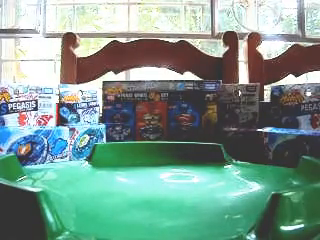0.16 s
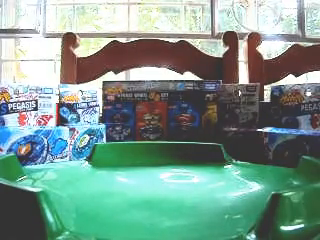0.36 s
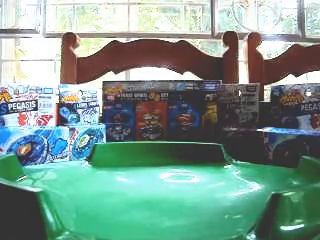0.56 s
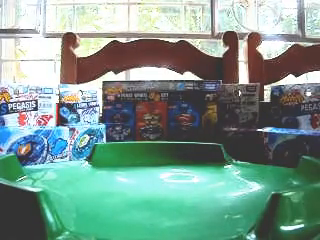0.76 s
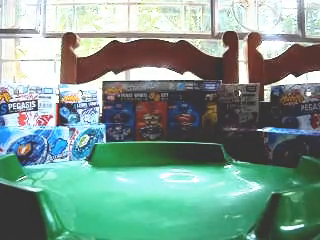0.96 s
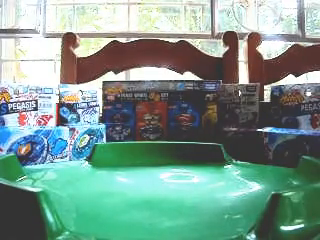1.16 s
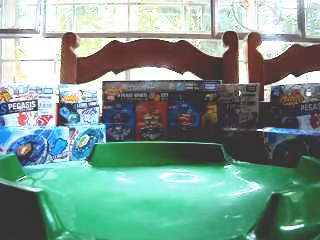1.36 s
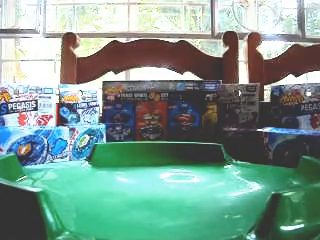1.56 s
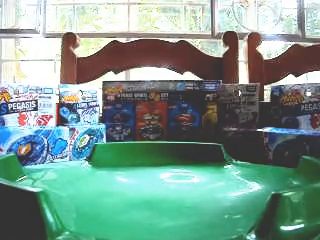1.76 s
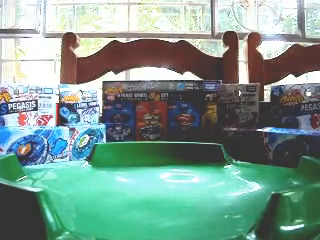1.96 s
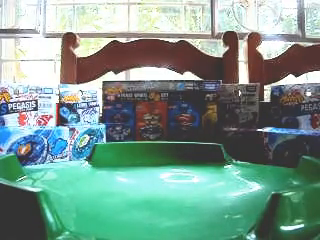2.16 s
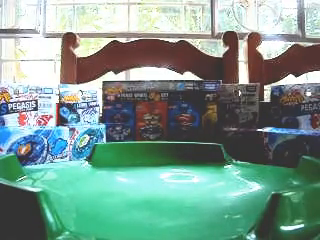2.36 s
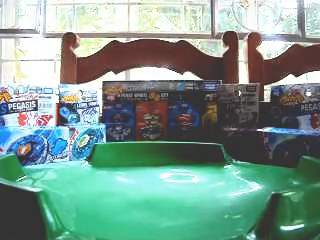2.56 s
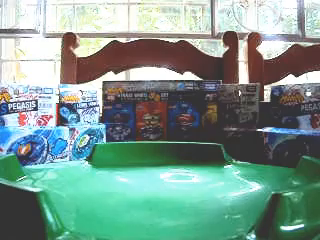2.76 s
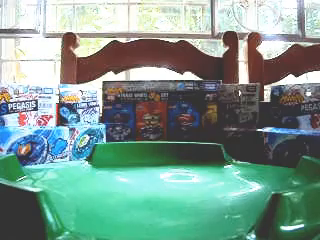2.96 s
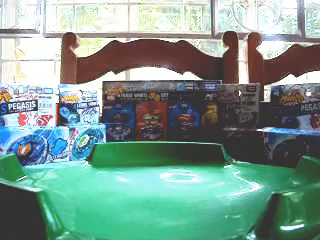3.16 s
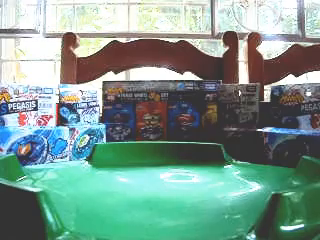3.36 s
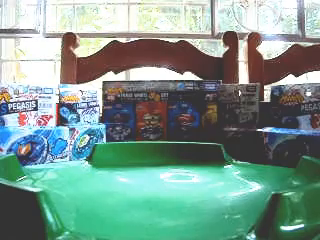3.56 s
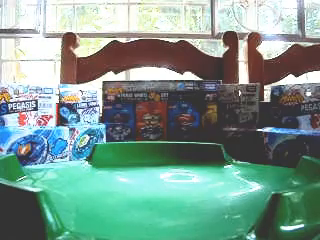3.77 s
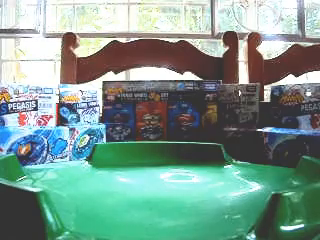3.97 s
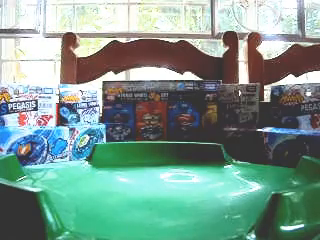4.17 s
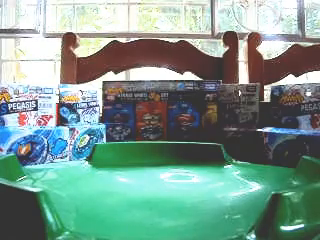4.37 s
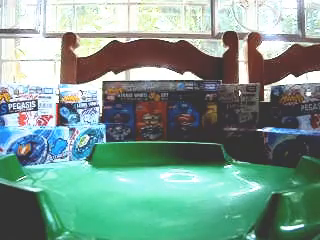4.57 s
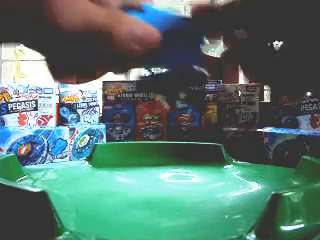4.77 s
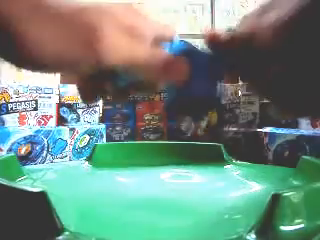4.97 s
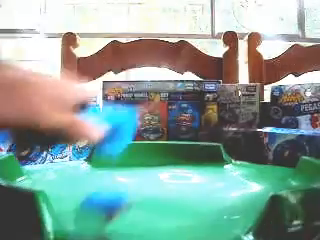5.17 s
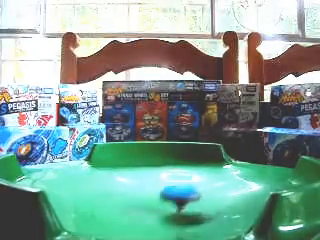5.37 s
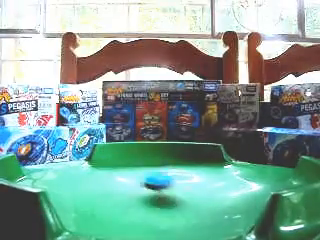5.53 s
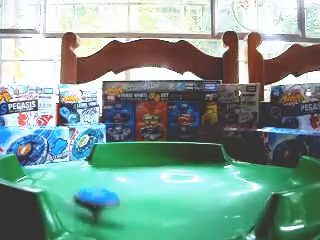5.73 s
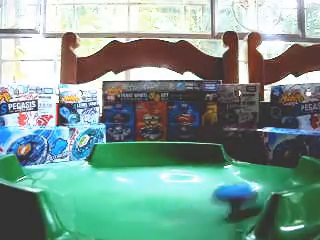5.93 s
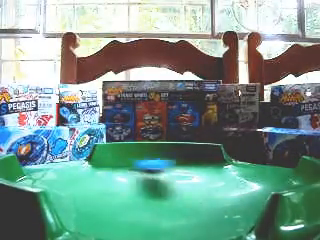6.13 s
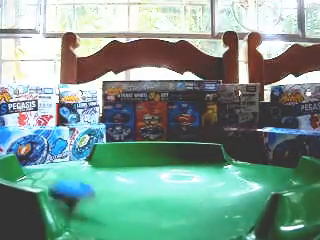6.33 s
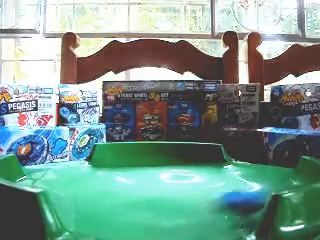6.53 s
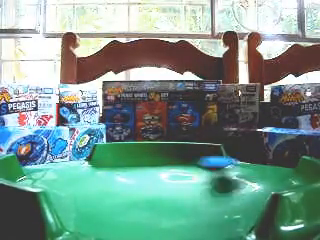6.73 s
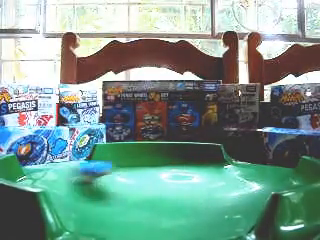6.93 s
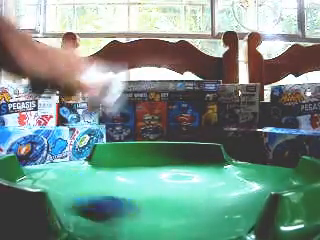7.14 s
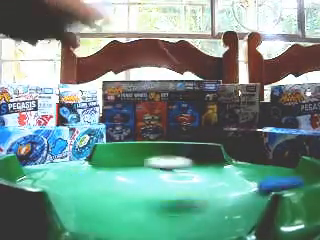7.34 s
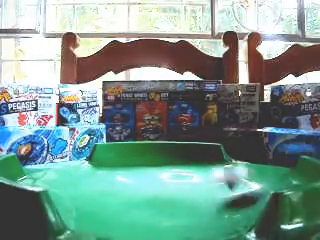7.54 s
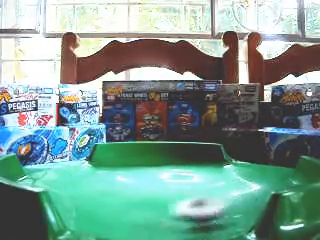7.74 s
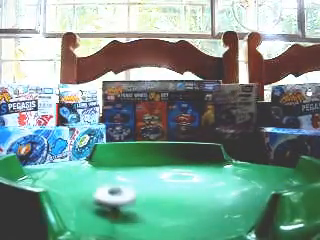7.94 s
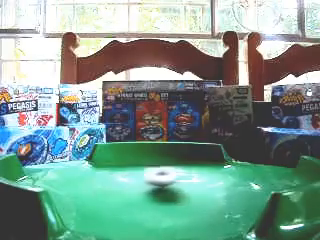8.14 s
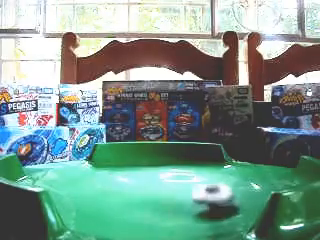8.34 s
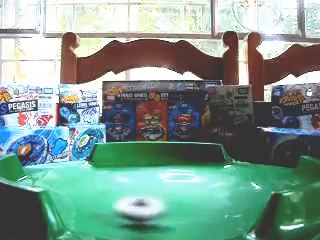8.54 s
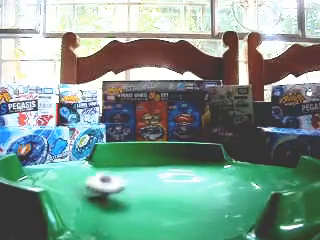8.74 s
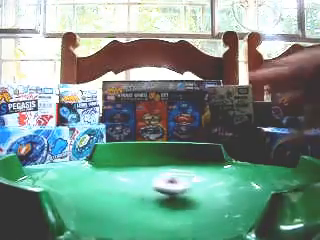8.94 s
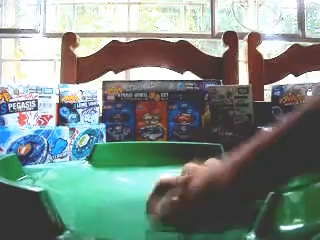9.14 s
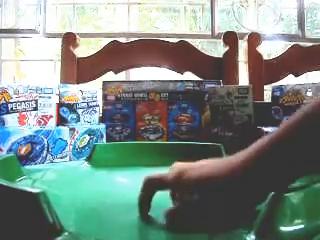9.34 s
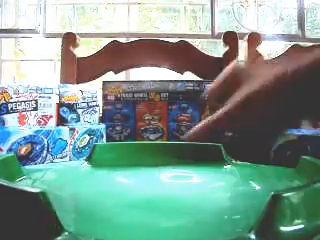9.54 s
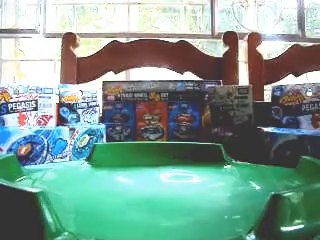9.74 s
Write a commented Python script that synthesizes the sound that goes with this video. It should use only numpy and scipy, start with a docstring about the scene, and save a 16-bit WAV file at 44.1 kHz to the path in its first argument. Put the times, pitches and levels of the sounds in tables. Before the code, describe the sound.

A small, dull microphone sits close to a plastic bowl on a table in a furnished room, with faint hiss and road rumble outside. At 0.2 s the bowl rattles strongly in quickening bounces; snaps and small clicks follow around 0.5 and 1.1-1.3, with light bumps at 1.7-2.0. A low hum comes and goes near 2.2. Soft knocks at 3.6-3.9 precede a vehicle's drone swelling to about 4.8, then fading. At 5.2 a toothed cord rips with a buzzing zip; a top lands in hard knocks at 5.35, with a bright metallic snap at 5.5 and bumps to 5.9. It circles with quiet rumble and whirr. A second rip at 7.25 leads to the loudest impacts at 7.45 and 7.77, tailing off by 8. A low wobbling hum peaks near 8.45, a launcher clunks down at 8.85, and slowing dull bumps at 9.3 stop the last top, leaving faint rumble.

```python
"""Close to a small microphone, launcher parts snap and clack (noise bursts) and a plastic bowl on a table is bumped
(noise bursts and ringing modes). A low hum comes and goes; an engine-like drone outside (sines) swells and fades
over road rumble (noise). Toothed cords (pulses and scrape) rip off two metal tops, one after the other; they land,
circle and whirr (noise through the bowl's modes) and clash. The bowl hums with a wobbling top (a sine), a launcher
clunks down on the table (modes and noise), and a hand brakes the last top in a few bumps."""
import sys
import numpy as np
from scipy import signal
from scipy.fft import rfft, irfft
from scipy.io import wavfile

SR = 44100
rng = np.random.default_rng(int(sys.argv[2]) if len(sys.argv) > 2 else 0)


def wrap_up_sound(samples):
    """Save the sound to the file named by the first command line argument, as 16-bit audio."""
    columns = np.atleast_2d(samples).T
    # keep every value between -1 and 1, then stretch to whole-number steps
    tamed = np.clip(columns, -1, 1)
    steps = np.round(tamed * 32767).astype(np.int16)
    wavfile.write(sys.argv[1], SR, steps)


N = 432180
TIME = np.arange(N) / SR  # seconds

# Modes of the plastic bowl. Each row: nominal frequency in Hz, relative level in dB, t60 in s.
BOWL = [(135.5, -3, 0.3), (193.8, -7.5, 0.19), (240, -11, 0.11), (285.6, -4.5, 0.12), (303.2, -5, 0.14),
        (437, -7.5, 0.16), (498.3, -5.5, 0.19), (553.2, -5, .15), (700, -4, 0.11), (741.2, -3, 0.13),
        (822, 0, 0.071), (902, 0, 0.1), (959.4, -0.5, .09), (1030, -3, 0.091), (1130, -4.5, 0.049),
        (1264, -1.5, 0.1), (1344, -8, 0.22), (1467, 7.5, 0.057), (1510, -11.5, .07), (1730, -17, 0.028)]


def amp(db):
    """Decibels to gain."""
    return 10 ** (np.asarray(db) / 20)


def unit(x, size=None):
    """Scales a sound so that its first samples, or all of it, have rms 1."""
    return x / np.sqrt(np.mean(x[:size] ** 2) + 1e-20)


def read(points, hz):
    """A table read on a log-frequency axis."""
    f, value = np.transpose(points)
    return np.interp(np.log(hz + 1), np.log(f + 1), value)


def curves(rows):
    """The columns of a table, after its column of times, at every sample."""
    s, *columns = np.transpose(rows)
    return [np.interp(TIME, s, column) for column in columns]


def add(mix, s, sound):
    """Mixes a sound in at a time in seconds."""
    part = mix[max(round(s * SR), 0):][:len(sound)]
    part += sound[:len(part)]


def gate(start, end, ramp):
    """1 between two times, with straight ramps inside both ends."""
    return np.clip(np.minimum(TIME - start, end - TIME) / ramp, 0, 1)


def band(x, lo_hz, hi_hz, order=3):
    """Causal band-pass."""
    return signal.sosfilt(signal.butter(order, [lo_hz, hi_hz], "band", fs=SR, output="sos"), x)


def colour(x, spectrum):
    """Filters a sound by a smooth curve of gain in dB over Hz."""
    return irfft(rfft(x) * amp(read(spectrum, np.fft.rfftfreq(N, 1 / SR))), N)


def drift(rate_hz):
    """Random wander of rms 1, mostly slower than a given rate."""
    keep = np.exp(-(np.fft.rfftfreq(N, 1 / SR) / rate_hz) ** 2)
    return unit(irfft(rfft(rng.standard_normal(N)) * keep, N))


def ringing(modes, t, detune=0):
    """One dying sine for each mode, with random phase and a slight chance shift of pitch."""
    hz, db, t60 = np.transpose(modes)[:, :, None]
    hz = hz * (1 + detune * rng.uniform(-1.1, 1, hz.shape))
    phase = rng.random(hz.shape)  # in turns
    return (amp(db - 60 * t / t60) * np.sin(2 * np.pi * (hz * t + phase))).sum(0)


def strike(t, t60, blow):
    """One hard contact followed by a dying scatter of noise."""
    return blow * (t == 0) + rng.standard_normal(len(t)) * amp(-60 * t / t60)


def bounces(start, length, gap):
    """Times and losses in dB of an object coming to rest: bounces ever sooner and weaker, the last die fastest."""
    ratio, loss_db, fall = .95, 1.17, 1.34
    k = np.arange(12)
    after = np.r_[0, np.cumsum(gap * ratio ** k[:-1])]
    return zip(start + after[after < length], loss_db * k ** fall)


def hit(level, spot_hz, weight, hardness, thump_hz, thump_width, flex_t60, crack_db, table_db,
        flex_db=17, blow=11, crack_t60=0.078, spot_db=7, spot_width=1.09, table_t60=0.25,
        crack_slope=0.75, crack_top_hz=4100):
    """A blow flexes the thin plastic in a quick dense burst, leaves its modes ringing and thuds into the table."""
    t = np.arange(SR // 4) / SR
    shell = ringing(BOWL, t, detune=.02) + amp(flex_db) * strike(t, flex_t60, blow)
    spot = amp(spot_db) * band(shell, spot_hz / spot_width, spot_hz * spot_width, order=1)
    table = band(strike(t, table_t60, blow), 45, 130, order=2)
    thump = band(shell, thump_hz / thump_width, thump_hz * thump_width, order=2)
    body = band(shell, 390, 1450, order=4) + spot
    edge = band(shell, 1342, 1870, order=2)
    crack = band(strike(t, crack_t60, blow), 1800, crack_top_hz, order=2)
    # weight feeds the table and the thump, hardness the edge and the crack
    parts = [(table, weight + table_db), (thump, weight), (body, 0), (edge, hardness),
             (crack, crack_db + crack_slope * hardness)]
    return sum(amp(level + db) * unit(part, size=1000) for part, db in parts)


def air(rumble_db=2, hiss_db=-56, tyre_db=-15, gust_db=1):
    """Two filtered noises: gusty road rumble from outside, and a smooth hiss that swells a little with it."""
    # Road level before the trims above. Each row: time in s, level in dB.
    road_level = [(0.1, -49.5), (3.2, -47), (4.0, -39), (5.05, -38), (6.1, -48), (7.1, -44.5), (9.1, -54),
                  (9.7, -55.5)]
    # Spectrum of the rumble. Each row: frequency in Hz, relative density in dB.
    rumble_spectrum = [(18, -38.5), (30, -15.5), (50, -3), (75, -7.5), (95, -13), (125, -5), (160, -5.5),
                       (210, -5.5), (300, -1), (420, -3), (550, -4.5), (800, -11.5), (1400, -16),
                       (2500, -28.5), (3500, -53.5)]
    # Spectrum of the hiss. Each row: frequency in Hz, relative density in dB.
    hiss_spectrum = [(500, -18), (1200, -0.5), (2200, -2), (4000, -2), (5000, -0.5), (6000, -4),
                     (7000, -25.5)]
    road, = curves(road_level)
    rumble = unit(colour(rng.standard_normal(N), rumble_spectrum))
    hiss = unit(colour(rng.standard_normal(N), hiss_spectrum))
    hiss_gain = np.hypot(amp(hiss_db), amp(road + tyre_db))
    return amp(road + rumble_db + gust_db * drift(6.7)) * rumble + hiss_gain * hiss


def engine(bass_db=(-41, -45), boom_db=(11, 5), middle_db=(-2, 0), upper_db=-10, fall_db=5.5,
           waver=0.00301, flutter_db=2):
    """Firing harmonics through the window: the lowest two swell in passing and boom under throttle, the rest flutter."""
    # Each row: time in s, firing rate in Hz before the waver, middle harmonics in dB before their offsets.
    firing = [(.7, 57.83, -58.5), (1.3, 66.73, -47), (2.0, 66.9, -50), (2.7, 65.76, -50.5),
              (3.2, 59.26, -50), (3.7, 59.7, -50.5), (4.25, 61.84, -39.5), (4.55, 64.7, -27.5),
              (4.8, 65.95, -36.5), (5.1, 66.97, -31), (6.1, 67.7, -59.5), (7.0, 65.33, -44),
              (8.0, 61.3, -52), (9.7, 56.65, -63)]
    pass_s, pass_width_s = 4.81, 0.5  # when nearest; time to travel its own distance from the house
    hz, level = curves(firing)
    throttle = gate(3.02, 4.63, ramp=0.3)  # the exhaust booms while the engine pulls
    near_db = -10 * np.log10(1 + ((TIME - pass_s) / pass_width_s) ** 2)
    turns = np.cumsum(hz * (1 + waver * drift(8.9))) / SR
    levels = [db + near_db + boom * throttle for db, boom in zip(bass_db, boom_db)]
    levels += [level + db for db in middle_db]
    levels += [levels[-1] + upper_db - fall_db * k for k in range(6)]
    out = np.zeros(N)
    for k, db in enumerate(levels, 1):
        flutter = flutter_db * min(k / 3, 1) * drift(6)
        out += amp(db + flutter) * np.sin(2 * np.pi * k * turns)
    return out


def low_hum(start=1.88, end=2.55, hz=114, level_db=-45, ramp=0.29):
    """A second low hum, one gently wavering sine, comes and goes."""
    return amp(level_db + drift(9)) * gate(start, end, ramp) * np.sin(2 * np.pi * hz * TIME)


def put_down(start=8.8453, length=.07, gap=.021, level_db=-24, rebound_db=-5, scatter_db=6, scatter_t60=0.041):
    """A launcher is dropped on the table: its modes and a noise burst make a pitched clunk with quick bounces."""
    # Modes of the plastic launcher. Each row: frequency in Hz, relative level in dB, t60 in s.
    launcher = [(280, -12, 0.23), (507, -15.5, .08), (766, -8, .12), (888, -1, 0.12), (1043, -10.5, .12),
                (1260, -9, 0.16), (1380, -13, 0.07), (1690, -21.5, .12), (2100, -20, .08)]
    out, t = np.zeros(N), np.arange(SR // 2) / SR
    for s, loss in bounces(start, length, gap):
        clunk = ringing(launcher, t) + amp(scatter_db) * band(strike(t, scatter_t60, 10), 220, 1500)
        gain = amp(level_db - loss + rebound_db * (s > start))
        add(out, s, gain * unit(band(clunk, 120, 2600), size=1000))
    return out


def winding(start=1.21, length=.09, snap_db=-46, clack_db=5, count=4):
    """Small pawl clicks, uneven in time and level, as a top is twisted onto its launcher."""
    chance = rng.random((count, 2))
    return [(start + length * (k + late) / count, snap_db - 3 * weak, clack_db)
            for k, (late, weak) in enumerate(chance)]


def clicks(snap_db=1, snap_hz=3560, blow=6, clack_t60=0.024, snap_t60=0.017, spread=1.24, rim_db=-24, clack_db=-1):
    """Hard contacts: a very short snap, a duller clack of plastic and a faint ring of metal."""
    # Small contacts of launcher, pawl and metal rims, before the trims snap_db and clack_db.
    # Each row: time in s, snap in dB, plastic clack in dB above the snap.
    contacts = [(0.515, -38.5, 4), (0.748, -49, -2.5), (1.145, -34, -3.5), (1.164, -32.5, -5.5),
                (1.178, -43, 11), (1.2, -38.5, 1), (1.341, -41, -6.5), (2.517, -47.5, -6),
                (2.735, -55.5, 2.5), (2.856, -50, -5), (3.591, -44, -3), (5.282, -32.5, 9.5),
                (5.291, -31, 6.5), (5.305, -28, 7.5), (5.485, -25, -2), (5.491, -27.5, -4),
                (5.512, -16.5, -10.5), (5.52, -28, -6.5), (5.581, -32.5, -8), (5.858, -31, 9),
                (7.375, -31, 3.5), (7.628, -34.5, -2.5), (7.683, -29.5, -13.5), (7.862, -29.5, -12)]
    # Modes of a metal rim. Each row: frequency in Hz, relative level in dB, t60 in s.
    rim = [(2843, -4, .4), (3060, -4, .4), (3250, -4, .45), (3370, -1, .45), (3450, -1, .45), (3555, 0, .5),
           (3698, 0, .45), (3768, -3, .4)]
    out, t = np.zeros(N), np.arange(SR // 2) / SR
    for s, snap, clack in contacts + winding():
        plastic = unit(band(strike(t, clack_t60, blow), 1200, 1830, order=2), size=1000)
        metal = unit(band(strike(t, snap_t60, blow), snap_hz / spread, snap_hz * spread, order=2), size=1000)
        metal = metal + amp(rim_db) * ringing(rim, t)
        add(out, s, amp(snap + snap_db) * (metal + amp(clack + clack_db) * plastic))
    return out


def rattles(far_db=-10, earliest=.3, latest=.7):
    """The nudged bowl rocks on its stiff wall; after each bounce its far side touches the table more softly."""
    # Each row: start in s, length in s, first gap in s, level in dB, favoured frequency in Hz,
    # weight in dB, hardness in dB.
    nudges = [(0.162, .29, .046, -17.5, 588, -4, -11), (1.723, .022, 0.013, -27.5, 1003, -6, -4.5),
              (3.591, .06, .044, -29.5, 700, -3.5, -4)]
    out = np.zeros(N)
    for start, length, gap, level, *touch in nudges:
        for s, loss in bounces(start, length, gap):
            far_s = s + gap * (earliest + (latest - earliest) * rng.random())
            for at, db in (s, level - loss), (far_s, level - loss + far_db):
                add(out, at, hit(db, *touch, thump_hz=382, thump_width=1.33, flex_t60=0.073,
                                 crack_db=-18.5, table_db=-26.5, crack_top_hz=2900))
    return out


def grab(start=9.324, gap=.018, slowing=1.16, level_db=-39, loss_db=2.0, thump_db=-39, count=6):
    """Fingers brake the last top: it bumps the floor of the bowl ever more slowly and dully."""
    out, s = np.zeros(N), start
    for k in range(count):
        level = level_db - loss_db * k
        # the thump keeps its level while the rest weakens
        add(out, s, hit(level, 660, thump_db - level, -9.5, thump_hz=164, thump_width=1.5, flex_t60=0.095,
                        crack_db=-7, table_db=-17))
        s += gap * slowing ** k
    return out


def ripcords(jitter=0.018, roll_off=1.1, rasp_db=2, uneven_db=4.5, buzz_rise_db=55, rasp_rise_db=15,
             bite_s=0.019, slip_db=8, release_db_per_s=330):
    """The toothed cord races through the launcher: a rising buzz and a rasp in its plastic case."""
    # Each row: yank in s, lead-in in s, length in s, acceleration in teeth per s per s,
    # buzz in dB and rasp in dB, both before the trims and the colour of the case.
    pulls = [(5.225, .075, .075, 19000, -29, -33.5), (7.261, 0.041, 0.13, 18500, -30, -30.5)]
    # Colour of the case. Each row: frequency in Hz, gain in dB.
    case = [(300, -30.5), (900, -7.5), (1400, 7.5), (1900, -3.5), (2400, -6.5),
            (3000, -8.5), (3700, 0.5), (4500, -2), (6500, -14.5)]
    slack_rate, yank_rate, top_rate = 1250, 1400, 2050  # teeth per second before the jitter
    out = np.zeros(N)
    for yank, lead, length, acceleration, buzz, rasp in pulls:
        t = TIME - yank
        rate = np.clip(yank_rate + acceleration * t, slack_rate, top_rate)
        turns = np.cumsum(rate * (1 + jitter * drift(250))) / SR
        teeth = unit(sum(np.cos(2 * np.pi * k * turns) / k ** roll_off for k in range(1, 4)))
        scrape = unit(band(rng.standard_normal(N), 500, 7000))
        # the teeth bite as the slack is taken up, then slip lightly soon after the yank
        slack, slipping = np.clip(-t / lead, 0, 1), np.clip(t / bite_s - 1, 0, 1)
        pull = amp(buzz - buzz_rise_db * slack - slip_db * slipping) * teeth
        pull += amp(rasp + rasp_db - rasp_rise_db * slack) * scrape
        release = release_db_per_s * np.maximum(t - length, 0)
        out += pull * amp(uneven_db * drift(90) - release) * (t > -lead)
    return colour(out, case)


def rolling(rumble_db=-2, whirr_db=-1, hum_db=-1, grain_db=3):
    """Spinning tips shake the bowl as they run over its small bumps, and whirr in a narrow band."""
    # Tips running round the bowl. Each row: start in s, end in s, rumble in dB before trim, fade in dB per s.
    runs = [(5.62, 7.762, -46, -0.5), (7.783, 8.292, -25.5, 44.5), (8.262, 9.324, -50.5, 0.5)]
    # Tips scrubbing the slope. Each row: start in s, end in s, whirr in dB before trim, fade in dB per s.
    whirrs = [(5.63, 7.76, -64, 1), (6.696, 7.0, -56, 17), (7.777, 8.2, -37.5, 62)]
    # The bowl hums in tune with a wobbling top. Each row: time in s, pitch in Hz, level in dB before trim.
    wobble = [(8.15, 293.6, -69), (8.299, 285.3, -39.5), (8.44, 282, -31.5), (8.52, 271, -35),
              (8.58, 268, -57)]
    lap_s, nearest_s, swing_db = .6, 6.2, 1.5  # a lap of the bowl, one loudest moment, swing up and down
    bumps = rng.standard_normal(N) * amp(grain_db * drift(40))
    bowl = signal.oaconvolve(bumps, ringing(BOWL, np.arange(SR // 2) / SR))[:N]
    shake = amp(rumble_db) * unit(band(bowl, 96, 600, order=1))
    whirr = amp(whirr_db) * unit(band(bumps, 1445, 1540, order=2))
    lap_db = swing_db * np.cos(2 * np.pi * (TIME - nearest_s) / lap_s)
    out = np.zeros(N)
    for sound, stretches in (shake, runs), (whirr, whirrs):
        for start, end, db, fade in stretches:
            faded = fade * np.clip(TIME - start, 0, end - start)
            out += sound * amp(db + lap_db - faded) * gate(start, end, .02)
    hz, db = curves(wobble)
    hum = amp(db + hum_db + drift(20)) * np.sin(2 * np.pi * np.cumsum(hz) / SR)
    return out + hum * gate(wobble[0][0], wobble[-1][0], .01)


def knocks():
    """Tops land, bounce and throw each other against the wall; now and then a hand knocks the bowl."""
    # Single blows on the bowl. Each row: time in s, level in dB, frequency in Hz that the struck spot favours,
    # weight in dB, hardness in dB, thump in Hz.
    blows = [(0.04, -41, 840, -6, -18.5, 368), (1.71, -38.5, 1000, -26, -5, 260),
             (1.813, -37, 760, -7, -16, 280), (2.023, -43.5, 980, -7, -9, 235),
             (3.708, -30.5, 545, -22, -5, 322), (3.879, -34.5, 547, -17, -10.5, 250),
             (5.331, -13.5, 730, 2, -7.5, 235), (5.343, -13.5, 703, -18, -21, 245),
             (5.351, -12, 716, -21.5, -12.5, 240), (5.452, -20.5, 676, 0, -6, 190),
             (5.535, -26, 560, 0, -20.5, 208), (5.822, -26.5, 547, 0.5, -3, 310),
             (5.857, -19.5, 1030, -17, -9, 295.1), (6.144, -39.5, 1038, -11, -3.5, 170),
             (7.435, -8.5, 1033, -5, -4, 239), (7.447, -9.5, 956, -33.5, -17.5, 236.8),
             (7.577, -18.5, 857, -8, -6, 305), (7.635, -25, 970, -4.5, -18.5, 235),
             (7.756, -22.5, 740, -7, -6, 345), (7.767, -6.5, 720, -26, -20, 259),
             (7.772, -12.5, 1430, -12.5, -15, 269.5), (7.788, -21.5, 545, 5.5, -21, 263),
             (7.874, -17, 700, -9, -6.5, 230), (7.89, -23, 670, 0.5, -19, 275),
             (7.91, -34, 530, 12, -9, 280), (7.965, -41.5, 535, 19.5, -7, 280),
             (8.51, -50, 858, 21, -10, 217)]
    out = np.zeros(N)
    for s, *blow in blows:
        add(out, s, hit(*blow, thump_width=1.344, flex_t60=0.061, crack_db=-13.5, table_db=-20.5))
    return out


def room(x, build=0.0009, count=3):
    """A furnished room: dense reflections, each band dying at its own speed."""
    # Decay of the room. Each row: frequency in Hz, t60 in s.
    room_decay = [(120, 0.84), (300, 1), (800, 0.55), (2000, 0.73), (4000, 0.53), (7000, 0.84)]
    out = np.zeros(N)
    for k in range(count):
        taps = rng.standard_normal(SR) * (1 - np.exp(-(np.arange(SR) / SR / build) ** 2))
        hz, t, z = signal.stft(taps, SR, nperseg=256)
        decay = amp(-60 * t / read(room_decay, hz)[:, None])
        tail = signal.istft(z * decay, SR, nperseg=256)[1]
        # three random tails crossfade, so no chance colour stays; the summed power stays even
        share = np.sqrt(2 / count) * np.cos(np.pi * (7 * TIME + k / count))
        out += signal.fftconvolve(x * share, tail / np.linalg.norm(tail))[:N]
    return out


def scene(knock_room_db=-8, click_room_db=-6):
    """Bowl and launchers in the room, over the sounds from outside."""
    dull = knocks() + rattles() + put_down() + grab()
    hard = clicks() + ripcords()
    echo = room(amp(knock_room_db) * dull + amp(click_room_db) * hard)
    return (dull + hard + echo + rolling() + engine() + low_hum() + air())[None]


def record(dry):
    """A dull little microphone that rounds off the highest peaks; then a steep low-pass."""
    # Response of the microphone. Each row: frequency in Hz, gain in dB.
    microphone = [(20, 2.5), (60, 3.5), (1000, -2.5), (3600, -5), (4800, -9.5), (5800, -14.5),
                  (7000, -23.5)]
    edge_hz = 6850
    x = colour(dry[0], microphone)
    x = x / (1 + x ** 6) ** (1 / 6)  # soft overload
    low_pass = signal.firwin(301, edge_hz, window=("kaiser", 8), fs=SR)
    return signal.oaconvolve(x, low_pass, "same")[None]


dry = scene()
out = record(dry)
wrap_up_sound(out)
```